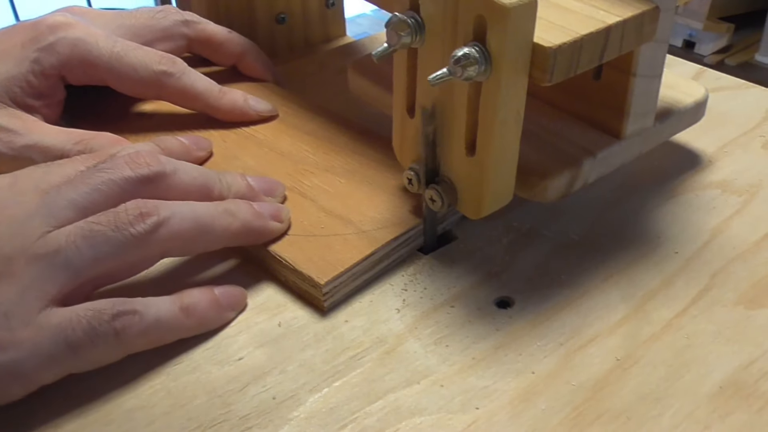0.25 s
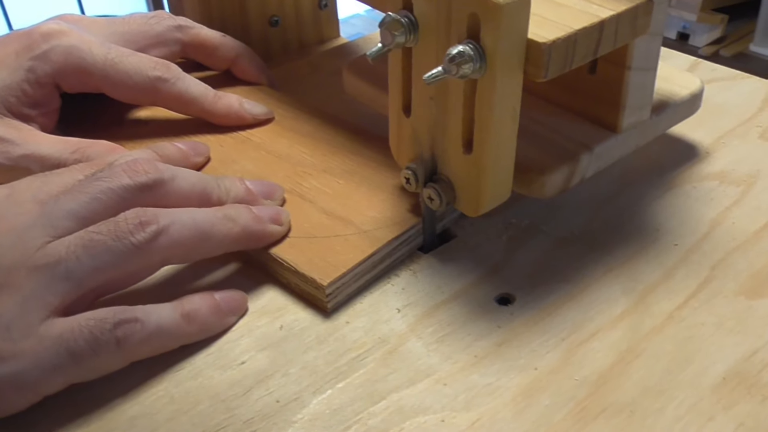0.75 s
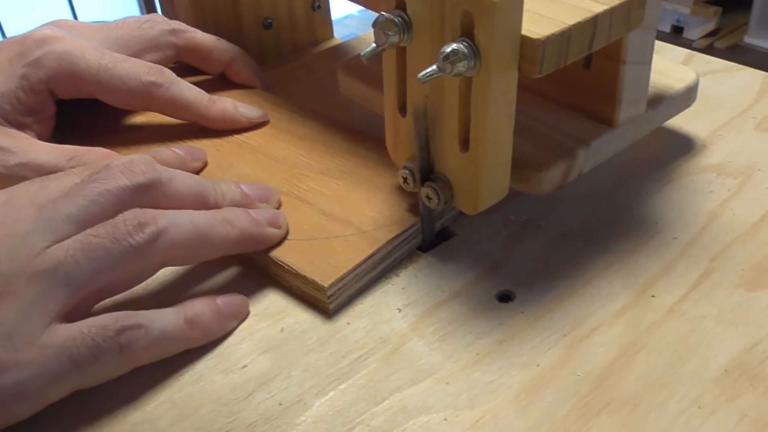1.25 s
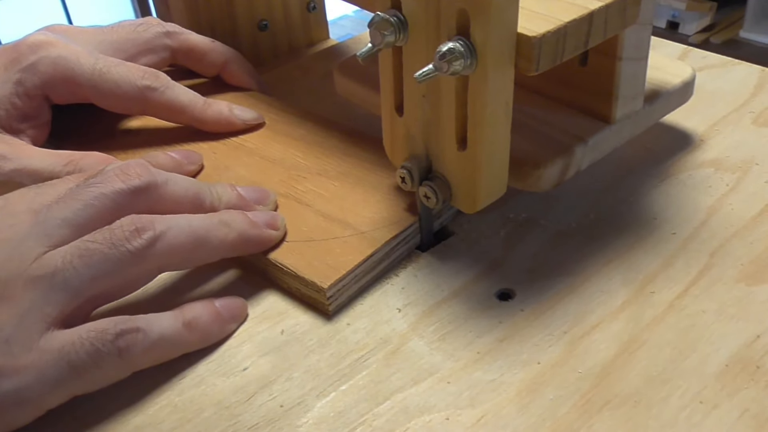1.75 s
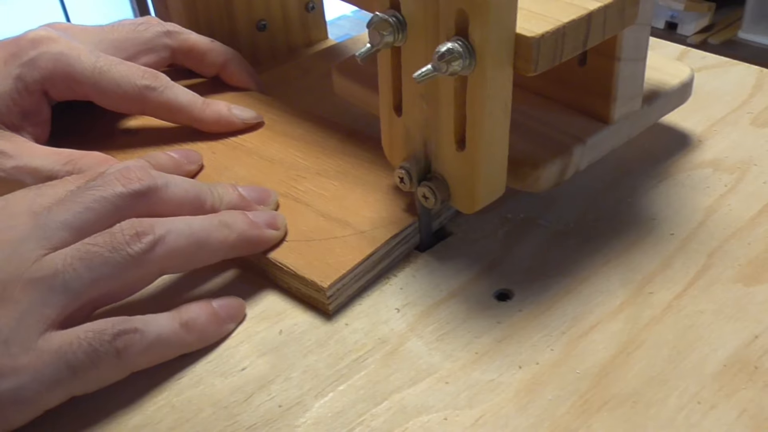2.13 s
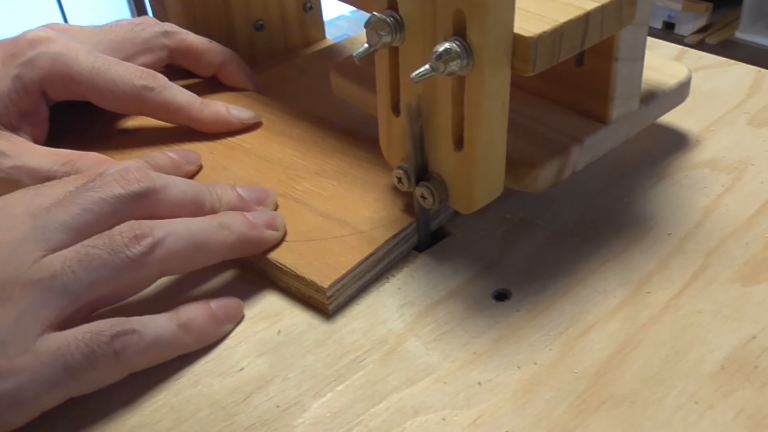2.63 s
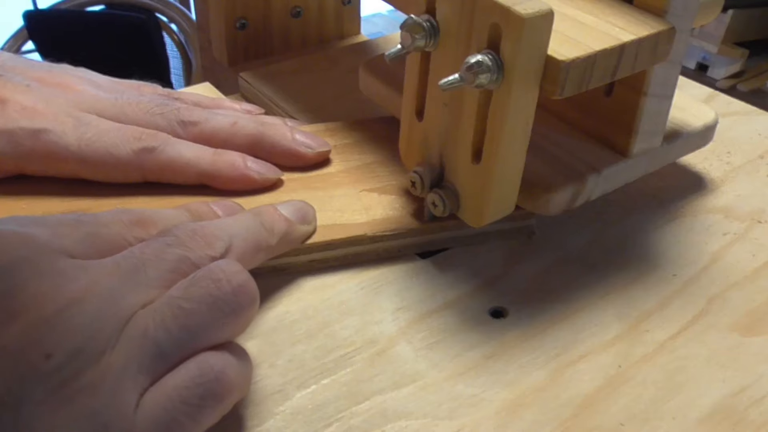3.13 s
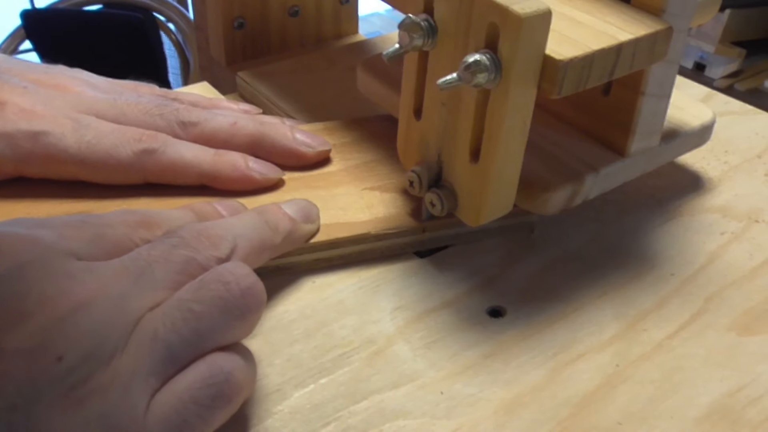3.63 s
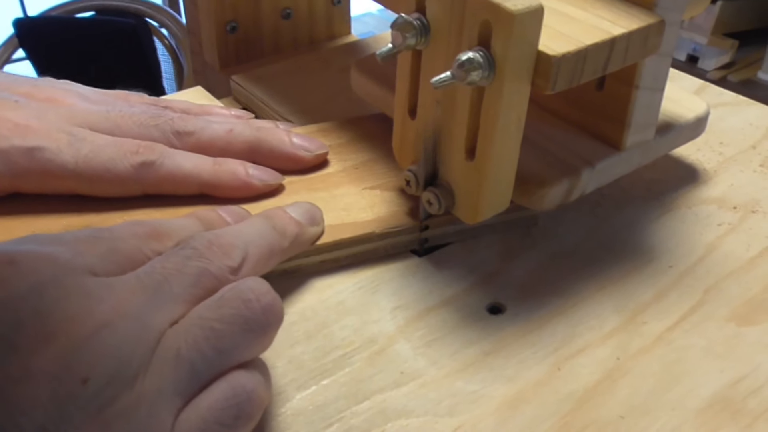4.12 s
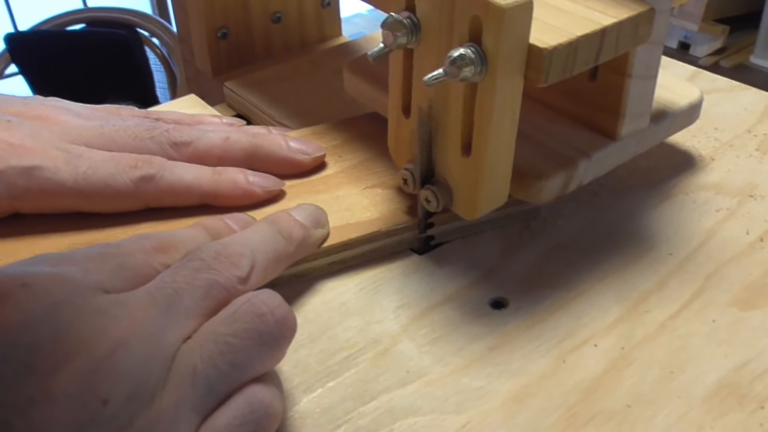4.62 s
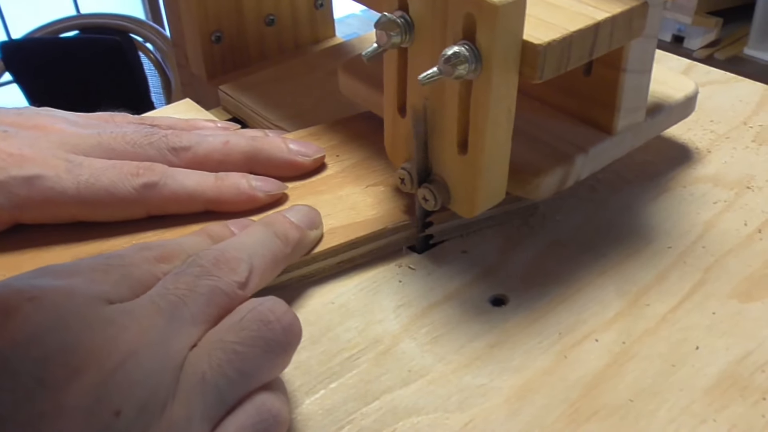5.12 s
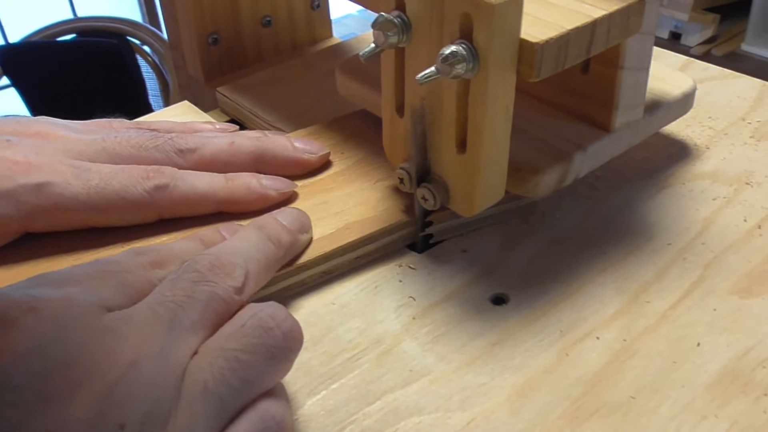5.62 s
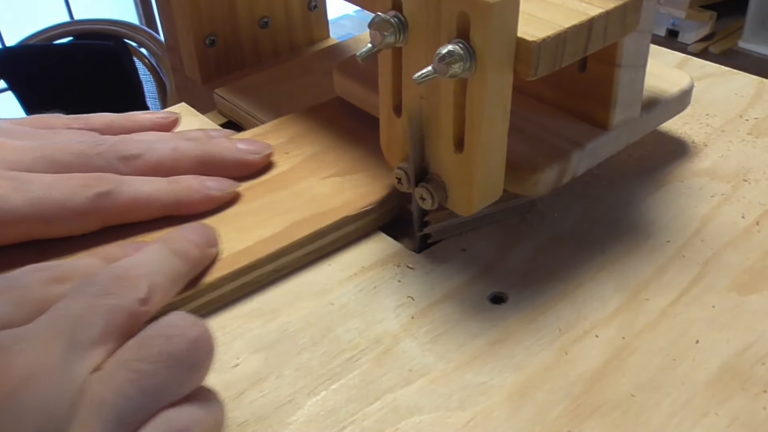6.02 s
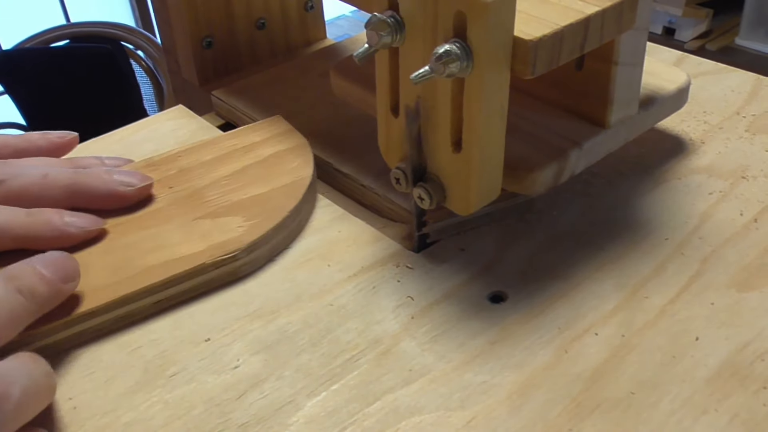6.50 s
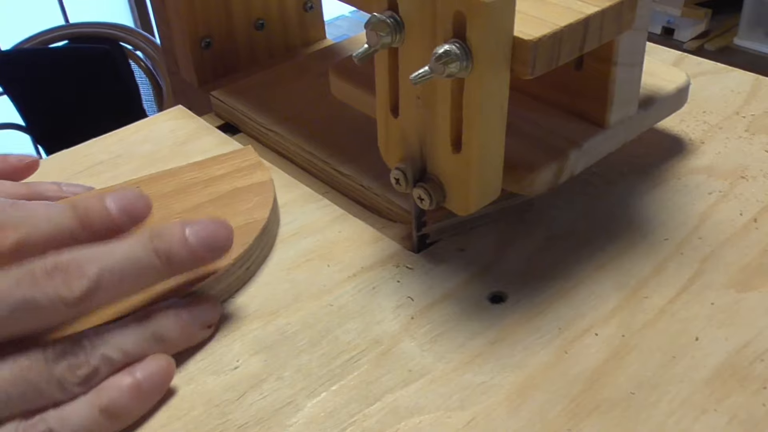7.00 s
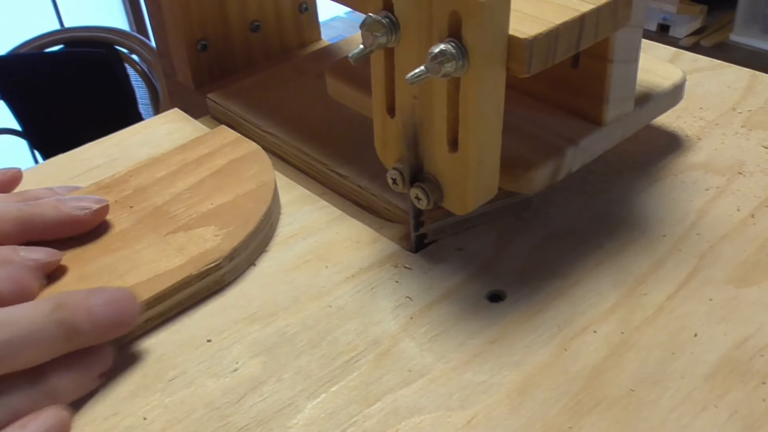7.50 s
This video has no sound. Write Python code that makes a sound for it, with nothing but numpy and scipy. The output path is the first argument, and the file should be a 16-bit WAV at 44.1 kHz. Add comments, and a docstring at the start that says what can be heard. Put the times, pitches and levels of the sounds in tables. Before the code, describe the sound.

A table-mounted jigsaw cuts plywood with a rattling buzz, turns higher and faster midway, then drops back with a few wooden clacks.

```python
"""Jigsaw under a plywood table

A table-mounted jigsaw saws a board, heard close up. Each crank turn drags the teeth down through the
wood and back up, ringing table, board and blade and jolting the cabinet. Splinters tear out; then the
table gives wooden clacks as the blade runs free. Three parts play end to end; the middle one is sped
up threefold, which triples all its pitches and rhythms."""
import sys
import numpy as np
from scipy import signal
from scipy.fft import rfft, irfft, next_fast_len
from scipy.io import wavfile
from scipy.ndimage import uniform_filter1d, map_coordinates

SR = 44100
rng = np.random.default_rng(int(sys.argv[2]) if len(sys.argv) > 2 else 0)


def master(y):
    """Save y as 16-bit WAV."""
    cut = np.clip(np.atleast_2d(y).T, -1, 1)
    pcm = np.round(cut * 32767)  # scale
    wavfile.write(sys.argv[1], SR, pcm.astype(np.int16))


N = 341775


def undb(db):
    return 10 ** (np.asarray(db) / 20)


def unit(x):
    return x / np.sqrt(np.mean(x ** 2))


def ring(x, modes, part=0, swung=0):
    """Sum of resonances, neighbours in opposite phase; rms 1."""
    total = 0
    for k, (hz, width_hz, *db) in enumerate(modes):
        mode = signal.lfilter(*signal.iirpeak(hz, hz / width_hz, SR), x)
        total += (-1) ** k * undb(db[part] + swung * db[-1]) * mode
    return unit(total)


def walk(n, rate_hz):
    """Slewed random steps; spread near 1."""
    hold = int(SR / rate_hz)
    return 0.83 * uniform_filter1d(np.repeat(rng.standard_normal(n // hold + 1), hold), hold)[:n]


def hump(turn, at, sharp):
    """One swell a turn, peaking at the given phase."""
    return np.exp(sharp * (np.cos(2 * np.pi * (turn - at)) - 1))


def beats(turn, at, count):
    """Unit pulses, count a turn, and their running number."""
    number = np.floor(count * (turn - at))
    return np.diff(number, prepend=number[0]), number


PATTERN_TURNS = 5.017


def repeating(turn, share, turns=PATTERN_TURNS, size=4096):
    """Noise that partly recurs each turn as the same teeth and cogs meet; the pattern drifts."""
    turn = turn - turn[0]
    patterns = rng.standard_normal((int(turn[-1] / turns) + 2, size))
    again = map_coordinates(patterns, [turn / turns, turn % 1 * (size - 1)], order=1)
    return np.sqrt(share) * unit(again) + np.sqrt(1 - share) * rng.standard_normal(len(turn))


def rattle(turn, at, sharp=62):
    """A brief rattle once a turn, much the same each time."""
    return unit(hump(turn, at, sharp) * repeating(turn, 1))


def scrape(turn, bite_db, steady, sharp, patchy_db, alike, crack=0, bite_share=0.6, turns=PATTERN_TURNS):
    """Noise swells on both strokes over steady gear whirr; fibres crack late in the down-stroke."""
    bite = undb(bite_share * bite_db / 2)
    strokes = bite * hump(turn, 0.0011, sharp) + hump(turn, 0.523, sharp) / bite
    cracks = crack * np.maximum(bite_db + 1.5, 0) / 10 * hump(turn, 0.097, 41)
    flicker = undb(patchy_db * walk(len(turn), 120))
    return (steady + strokes + cracks) * flicker * repeating(turn, alike, turns)


def circuit_noise(shape, level_db=-86.5):
    """Faint electronic noise, stronger in the bass."""
    return undb(level_db) * unit(signal.lfilter([1], [1, -.97], rng.standard_normal(shape)))


# Stereo balance: f/Hz, left minus right/dB
BALANCE_DB = [(60, -2), (110, -2.5), (200, -2.0), (380, -1.5), (700, -2), (1290, 1.0), (2380, 2),
              (4400, -1.5), (8120, 2.5), (15000, -5)]
# Stereo width: f/Hz, side minus mid/dB
WIDTH_DB = [(60, -2), (110, -17), (200, -14.5), (380, -27), (700, -8), (1290, -13.5), (2380, -8.5),
            (4400, -6), (8120, -2.5), (15000, -5)]


def reflections(x, decay_s=0.04, bass_cut_hz=90):
    """Near reflections reach two small capsules unalike, forming the side signal; deep bass is lost."""
    n = next_fast_len(len(x))
    log_hz = np.log(np.arange(n // 2 + 1) * SR / n + 1)
    balance, width = (undb(np.interp(log_hz, np.log(hz), db))
                      for hz, db in map(np.transpose, (BALANCE_DB, WIDTH_DB)))
    lag_s = np.arange(SR // 2) / SR
    echo = rfft(rng.standard_normal(len(lag_s)) * np.exp(-lag_s / decay_s), n)
    mid = rfft(signal.lfilter(*signal.butter(2, bass_cut_hz, "high", fs=SR), x), n)
    side = mid * width * echo / np.abs(echo)
    return irfft([(mid + side) * balance ** .5, (mid - side) / balance ** .5], n)[:, :len(x)]


# Hum tones: crank harmonic, level/dB, change with swing/dB
HUM_TONES = [(10, -62, -22), (13, -75, 20)]


def cabinet_hum(turn, swung):
    """The cabinet hums at multiples of the crank rate, wavering in level."""
    tones = sum(undb(db + change * swung) * np.sin(2 * np.pi * m * turn) for m, db, change in HUM_TONES)
    return tones * undb(2.4 * walk(len(turn), 3.03))


# Cabinet modes: f/Hz, width/Hz, level/dB x 3 parts, change with swing/dB
CABINET_MODES = [(201.3, 14.5, 8, 2, -14, -10.5), (123.4, 22.7, -10.5, -1, -9.5, -11),
                 (253, 160, -10, -29, -18, 6), (89, 105, -28, -32.5, -21, 13), (189.4, 21.6, 1, 4, 0, -6.5),
                 (176.3, 6.4, -8, -12.5, -18, 9), (215, 14, -25, -4.5, -27, 2.5)]


def cabinet_thump(part, turn, jolt_at, alike, turns, swung):
    """The crank jolts the cabinet at each blade reversal, harder at the bottom."""
    jolts, half_turn = beats(turn, jolt_at, count=2)
    jolts *= undb(5.5 * (half_turn % 2 - .5) + 1.1 * rng.standard_normal(len(turn)))
    rumble = 1.28 * repeating(turn, 0.57 * alike, turns)
    return ring(unit(jolts) + rumble, CABINET_MODES, part, swung)


# Blade modes: f/Hz, width/Hz, level/dB x 3 parts
BLADE_MODES = [(6480, 630, -3, 8, 6.5), (7790, 1950, -1.5, -6, 5.5), (8850, 2000, -4.5, 21, -0.5),
               (10120, 320, 5, 0, -8), (11420, 370, -2.5, 7, 2), (13270, 930, -13.5, -12, -6.5),
               (10480, 1440, -10, -10, 0.5)]
# Hiss per part: steady share, stroke sharpness
HISS_SHAPE = [(0.6, 2.07), (0.65, 2.9), (0.58, 1.32)]
# Zing from cracking fibres: gain per part
ZING_GAIN = [1.43, .8, .4]


def blade_hiss(part, turn, bite_db, moving, treble_db):
    """The scraping blade hisses; the louder it is, the more its strokes separate."""
    steady, sharp = HISS_SHAPE[part]
    friction = scrape(turn, bite_db, steady * undb(-1.6 * treble_db), sharp, patchy_db=2.1, alike=0,
                      crack=ZING_GAIN[part], bite_share=0.33)
    return ring(moving * friction, BLADE_MODES, part)


# Guide modes: f/Hz, width/Hz, level/dB x 3 parts
GUIDE_MODES = [(1840, 850, -8.5, -26, -13.5), (2164, 194, 4.5, -1.5, 2.5), (2640, 580, -6, -5, -3),
               (3430, 220, 3, 1.5, 1.5), (3800, 830, -6, -5, -5), (5140, 1360, -12.5, -7, -12)]
# Guide scrape per part: steady share, stroke sharpness
GUIDE_SHAPE = [(.94, 0.66), (0.95, 0.83), (1, 0.51)]


def guide_chatter(part, turn, bite_db, moving, crack, snap_at, snap_gain):
    """The blade scrapes in its guide and snaps once a turn."""
    snap = snap_gain * rattle(turn, snap_at, sharp=66)
    friction = scrape(turn, bite_db, *GUIDE_SHAPE[part], patchy_db=2.3, alike=0.085,
                      crack=2 * crack, bite_share=0.58)
    return ring(snap + moving * friction, GUIDE_MODES, part)


# Board modes: f/Hz, width/Hz, level/dB x 3 parts
BOARD_MODES = [(886, 58, -1.5, -7, -5.5), (966.6, 12.6, 4, 1, -4), (1096, 114, 1, -1.5, 0),
               (1297, 242, -2, -1, -3.5), (1400, 107, -2.5, 3, -1), (781, 47, -11.5, -6, -12.5),
               (1447, 55, -6.5, -8, -12.5)]
# Bite heard in the rasp: share per part
BOARD_BITE = [0.03, 1, 0.13]


def board_rasp(part, turn, bite_db, moving, hits, steady, crack, alike):
    """Hits, friction and cracking fibres ring the board."""
    friction = scrape(turn, bite_db, steady, sharp=1.87, patchy_db=1, alike=0.25 * alike,
                      crack=4.1 * crack, bite_share=BOARD_BITE[part])
    return ring(hits + moving * friction, BOARD_MODES, part)


# Upper table modes: f/Hz, width/Hz, level/dB x 3 parts, change with swing/dB
RING_MODES = [(599, 29.4, 16, 7.5, 6, 1.5), (674, 160, -1.5, -5.5, -6, 1), (488, 147, 3, 0.5, -5, 1.5),
              (633, 9.5, -11, -4.5, -8, 9), (650, 15, 1, -15, -2, 12)]
# Ring scrape per part: steady share, stroke sharpness
RING_SHAPE = [(0.17, 0.51), (0.17, 1.07), (0.29, 0.53)]


def table_ring(part, turn, bite_db, moving, hits, alike, turns, swung):
    """The table's upper modes take the bite reversed, answering the opposite stroke."""
    friction = scrape(turn - .04, -bite_db, *RING_SHAPE[part], patchy_db=1.7,
                      alike=0.28 * alike, turns=turns)
    return ring(hits + moving * friction, RING_MODES, part, swung)


# Wooden clacks from the saw table as the blade runs free: t/s, level/dB
TABLE_CLACKS = [(6.139, -37), (6.278, -30), (6.618, -30), (7.225, -26), (7.662, -29)]
# Splinters tearing out near the edge: t/s, level/dB
SPLINTER_TEARS = [(5.204, -46.5), (5.2796, -48), (5.315, -46), (5.3529, -49), (5.3864, -46), (5.4253, -50),
                  (5.4557, -52), (5.528, -47), (5.5635, -46), (5.5994, -42.5), (5.6333, -41), (5.7036, -44)]
# Short rasps in the guide: t/s, level/dB
GUIDE_RASPS = [(0.2643, -49), (0.4948, -43.5), (1.272, -47), (2.2428, -50), (2.3346, -47), (2.4114, -45),
               (2.4887, -46), (5.3652, -45), (5.4316, -47), (5.5248, -46), (5.6326, -44), (6.1928, -51),
               (6.2617, -47), (6.3984, -46), (6.5345, -49), (6.8054, -42), (7.008, -47), (7.1427, -52),
               (7.4101, -47)]
# f/Hz, width/Hz, level/dB
SPLINTER_MODES = [(8100, 2900, -1), (11300, 3200, 2), (4800, 4100, -5)]
GUIDE_RASP_MODES = [(3350, 420, -3), (3750, 500, -7), (2220, 400, -11)]


def bursts(t, events, modes, attack_s, fade_s):
    """Clacks, tears or rasps: short bursts of resonant noise."""
    envelope = np.zeros(len(t))
    for start_s, db in events:
        a, b = np.searchsorted(t, [start_s, start_s + attack_s + 8 * fade_s])
        age_s = t[a:b] - start_s
        envelope[a:b] += undb(db) / 2 * np.minimum(age_s / attack_s, np.exp((attack_s - age_s) / fade_s))
    return envelope * ring(rng.standard_normal(len(t)), modes) if envelope.any() else envelope


def holder_slaps(turn, bounce_s=0.0061):
    """Play in the blade holder slaps as the down-stroke takes hold, with one bounce."""
    pulses, _ = beats(turn, -.195, count=1)
    pulses *= undb(1.9 * rng.standard_normal(len(turn)))
    slaps = np.convolve(pulses, np.hanning(SR // 1500), "same")
    return unit(slaps + 0.46 * np.roll(slaps, int(bounce_s * SR)))


def teeth(turn, bite_db, scatter_db=1.5, per_stroke=10.2):
    """Each tooth clicks past the wood, fastest and hardest mid-stroke."""
    tooth = np.floor(per_stroke / 2 * np.sin(2 * np.pi * turn))
    speed = np.cos(2 * np.pi * turn)
    hit = np.flatnonzero(np.diff(tooth))
    hit_db = np.sign(speed[hit]) * bite_db[hit] / 2 + scatter_db * rng.standard_normal(len(hit))
    clicks = np.zeros(len(turn))
    clicks[hit] = np.abs(speed[hit]) ** 1.7 * undb(hit_db)
    return unit(clicks)


# Lower table modes: f/Hz, width/Hz, level/dB x 3 parts, change with swing/dB
BUZZ_MODES = [(431.7, 43, -1.5, -4.5, 6, 1), (382.5, 66, -5.5, -5.5, 5, -0.5),
              (449, 37, -4.5, -3.5, -12, 3.5), (292, 10, -7, -26, -7, 6), (410, 13, -5, -7, -0.5, 5),
              (485.6, 13, -29, -7, -5, -4)]
# Buzz scrape per part: steady share, stroke sharpness
BUZZ_SHAPE = [(0.86, 0.34), (0.73, 0.69), (0.96, 0.3)]


def table_buzz(part, turn, bite_db, moving, hits, alike, turns, swung):
    """Hits and friction drive the table's lower modes."""
    friction = scrape(turn, bite_db, *BUZZ_SHAPE[part], patchy_db=0.28, alike=0.5 * alike, turns=turns)
    return ring(hits + .5 * moving * friction, BUZZ_MODES, part, swung)


# Blade seating per part: tooth lead/turns, grip, steady rasp, play, turn likeness, jolt phase/turns
SEATING = [(.005, 1.19, 1.23, 0.062, 1.5, -.2), (.05, 0.74, 0.092, 0.03, 1.36, -.38),
           (.03, 0.35, 1.53, 0.45, 0.56, -.4)]
# Knocks per part: (phase/turns, gain) for table knock, guide snap, blade back-slap
TURN_KNOCKS = [(-0.401, 0.68, 0.096, 0.82, 0.32, 0.048), (0.143, 0.57, 0.043, .1, 0.305, 0.061),
               (-0.23, 0.15, -0.43, 0.46, 0.35, 0.67)]
# Push passed to grip and knock: share per part
PUSH_SHARE = [0.42, 0.15, 0.11]
# Tooth timing spread per part
WANDER_TURNS = [.001, .0035, .004]
# Friction dip at blade reversal: depth per part
REVERSAL_DIP = [0.11, 0.32, 0.12]
# Fibre cracking: gain per part
CRACK_GAIN = [0.94, 0.74, 0.51]
# Life of the table and cabinet noise patterns per part
HOLD_TURNS = [8.0, 7.0, 6.0]
# Mix per layer: level/dB x 3 parts, shares of push, rub, treble
MIX = dict(buzz=(-42.5, -44.5, -45, 0.5, 0, 0), table=(-48.5, -46, -44.5, 0.7, 1.51, -0.08),
       rasp=(-49, -47, -48, 0.59, 1.1, -0.14), chips=(-61.5, -62.5, -59.5, 0.45, 1.39, 0.45),
       hiss=(-60, -63, -59.5, .5, 1.08, 1.5), thump=(-56.5, -57, -57, 0.22, 0.74, 1))


def jigsaw(part, turn, swung, push_db, rub_db, treble_db, bite_db):
    """Crank and blade shake table, board, guide and cabinet; the hands steer the mix."""
    lead, grip, steady, play, alike, jolt_at = SEATING[part]
    knock_at, knock, snap_at, snap, back_at, back = TURN_KNOCKS[part]
    crack, turns = CRACK_GAIN[part], HOLD_TURNS[part]
    cut = turn + lead
    grip *= undb(PUSH_SHARE[part] * push_db - 5 * swung)
    knock *= undb(PUSH_SHARE[part] * push_db - 3 * swung)
    wander = WANDER_TURNS[part] * walk(len(turn), 30)
    moving = 1 - REVERSAL_DIP[part] * hump(2 * cut, 0.496, sharp=96)
    slaps = 1.27 * play * holder_slaps(turn)
    clicks = grip * teeth(cut + wander, bite_db, scatter_db=2.5)
    buzz_hits = clicks + 0.75 * slaps + back * rattle(turn, back_at)
    buzz = table_buzz(part, cut, bite_db, moving, buzz_hits, alike, turns, swung)
    opposite_clicks = grip * teeth(cut + .46, 1.2 * bite_db)
    ring_hits = 0.61 * opposite_clicks + 0.22 * slaps + knock * rattle(turn, knock_at)
    layers = dict(
        buzz=buzz,
        table=table_ring(part, cut, bite_db, moving, ring_hits, alike, turns, swung),
        rasp=board_rasp(part, cut, bite_db, moving, 0.037 * clicks + 0.63 * slaps, steady, crack, alike),
        chips=guide_chatter(part, turn, bite_db, moving, crack, snap_at, snap),
        hiss=blade_hiss(part, turn, bite_db, moving, treble_db),
        thump=cabinet_thump(part, cut, jolt_at, alike, turns, swung))
    return sum(layers[name] * undb(db[part] + push * push_db + rub * rub_db + treble * treble_db)
               for name, (*db, push, rub, treble) in MIX.items())


# Parts: start/s, end/s, speed-up, start phase/turns (0 = mid down-stroke)
PARTS = [(0, 3.077, 1, .632), (3.078, 5.164, 3, .426), (5.169, 7.75, 1, .816)]
# Crank rate per part, sagging under load: t/s, f/Hz before speed-up
CRANK_HZ = [
    [(0, 13.004), (.6, 13.019), (1.25, 12.76), (1.9, 13.47), (2.6, 12.759), (3.077, 13.195)],
    [(3.078, 12.56), (3.59, 12.63), (3.78, 12.87), (3.95, 12.8), (4.32, 12.97), (4.55, 13.37),
     (4.73, 13.53), (5.01, 13.9), (5.164, 14.03)],
    [(5.169, 14.224), (7.75, 15.075)],
]
# Hands per part: t/s, push on teeth/dB, flank rub/dB, treble/dB, bite (down- over up-stroke)/dB
HANDS_FIRST = [(0, 2.5, 2, 0.5, 4), (.22, -0.5, 0.5, -1, 14.5), (1.0, 1, 0, 0.5, 13), (1.36, 6, -1, 1, 1),
               (1.45, -8, 3.5, 0, 0), (1.62, -7.5, 5, 0, -2), (1.76, -4.5, 6, -2, -3),
               (1.87, -14, 9.5, 2, -4), (1.97, 6, 2.5, 2, 3.5), (2.25, 4.5, 0.5, 0.5, 7.5),
               (2.93, 1.5, 0.5, 1, 10), (2.99, -9, 3, -3, 3), (3.077, -34, 13.5, -3.5, 2)]
HANDS_FAST = [(3.08, -4, 3.5, -8, 1.6), (3.28, 4.5, -2, -1.5, 2.3), (3.7, -0.5, 0, -0.5, 4.1),
              (4.1, 5.5, -2.5, 0, 1.1), (4.68, 6, -2.5, 6, 1.3), (4.75, -3, 1.5, 5.5, 1.1),
              (4.84, 8.5, -3.4, 6, 0.51), (4.95, 3, -1.5, 3.5, 1.1), (5.164, -6.5, 3.5, 8.5, 1.2)]
HANDS_LAST = [(5.169, -4.5, 0.5, 2, -2.2), (5.26, -10.5, 4.5, 1, -1.7), (5.35, -2.5, 2, -1, -1.4),
              (5.55, -2.5, 2, 2, -1.5), (5.65, 2, 1, 1, -1.5), (5.73, -5.5, 3.5, -0.5, -1.8),
              (6.0, 3, 0, 0, -0.39), (7.75, 2, 0.5, 0, -1.5)]
# Pan per part: left minus right/dB
PAN_DB = [0, 0.4, -0.3]
SWING_S = (4.13, 4.68)  # the board swings round: modes shift, teeth grip less


def scene():
    """Three stretches of sawing, each built at natural speed and resampled into its slot."""
    out = np.zeros((2, N))
    for part, hands in enumerate((HANDS_FIRST, HANDS_FAST, HANDS_LAST)):
        start_s, end_s, speed, phase = PARTS[part]
        first, last = int(start_s * SR), min(int(end_s * SR), N)
        t = np.linspace(start_s, end_s, (last - first) * speed)
        hand_s, *curves_db = np.transpose(hands)
        turn = phase + np.cumsum(np.interp(t, *np.transpose(CRANK_HZ[part]))) / SR
        swung = np.interp(t, SWING_S, (0, 1)) * (speed > 1)
        saw = jigsaw(part, turn, swung, *(np.interp(t, hand_s, db) for db in curves_db))
        if speed > 1:
            saw += cabinet_hum(turn, swung)
        saw += bursts(t, TABLE_CLACKS, RING_MODES, attack_s=0.002, fade_s=0.0067)
        saw += bursts(t, SPLINTER_TEARS, SPLINTER_MODES, attack_s=0.0019, fade_s=0.011)
        saw += bursts(t, GUIDE_RASPS, GUIDE_RASP_MODES, attack_s=0.0026, fade_s=0.0093)
        pan = undb(np.array([[.5], [-.5]]) * PAN_DB[part])
        stereo = signal.resample_poly(pan * reflections(saw), 1, speed, axis=1)
        age_s = np.arange(last - first) / SR
        edge_fade = np.clip(np.minimum(age_s, age_s[::-1]) / 0.0003, .05, 1)
        out[:, first:last] = stereo * edge_fade
    return out


def record(dry):
    """Circuit noise, then a steep treble cut."""
    top_hz = 15750
    lowpass = signal.ellip(12, .2, 70, top_hz, fs=SR, output="sos")
    return signal.sosfilt(lowpass, dry + circuit_noise(dry.shape))


dry = scene()
out = record(dry)
master(out)
```